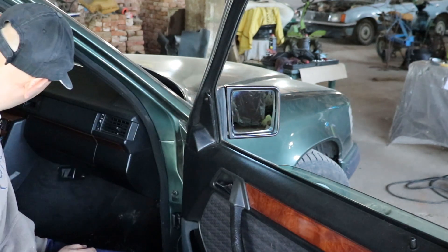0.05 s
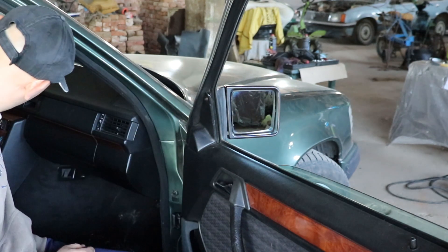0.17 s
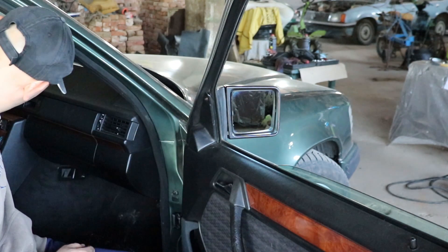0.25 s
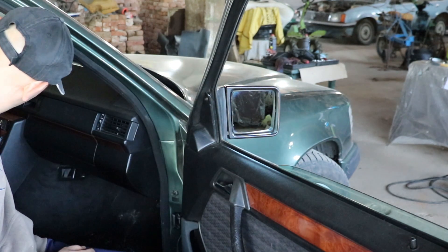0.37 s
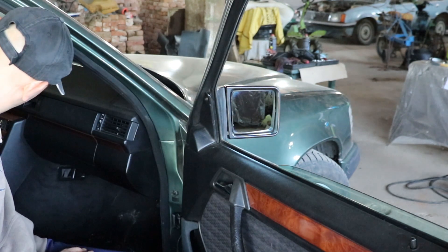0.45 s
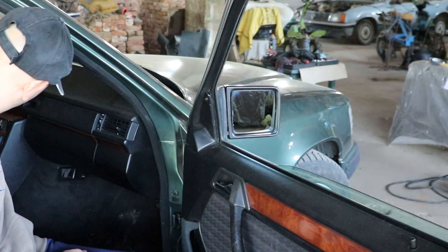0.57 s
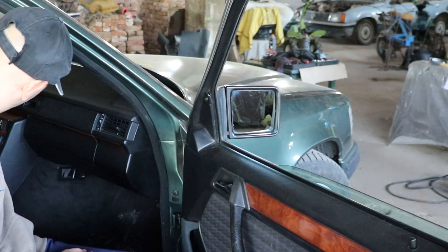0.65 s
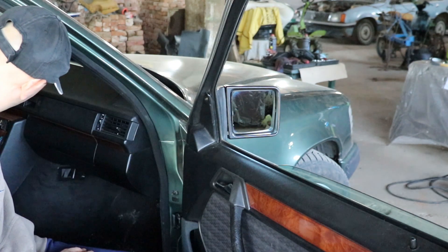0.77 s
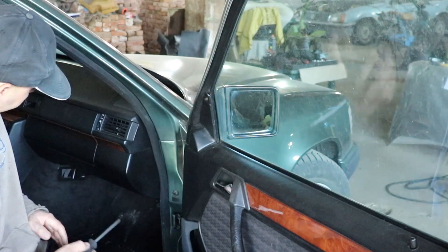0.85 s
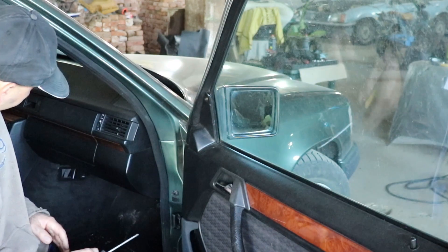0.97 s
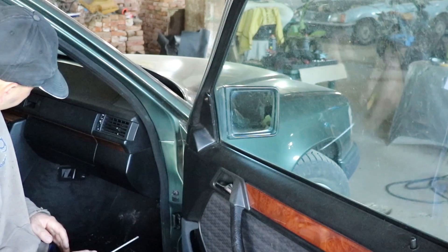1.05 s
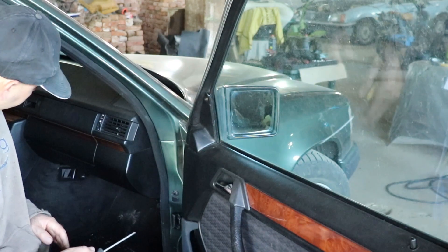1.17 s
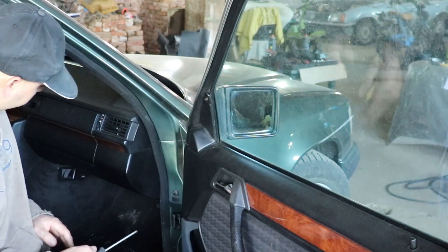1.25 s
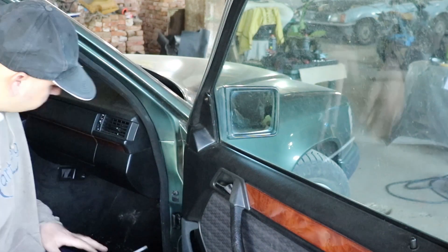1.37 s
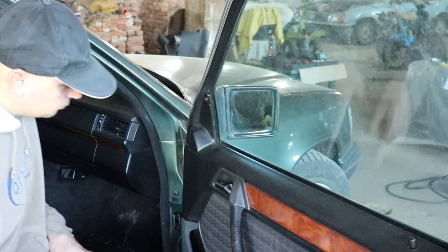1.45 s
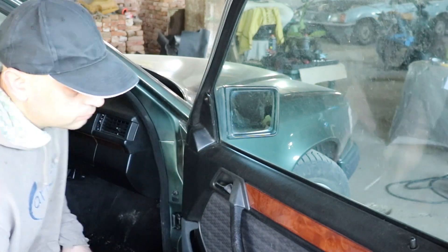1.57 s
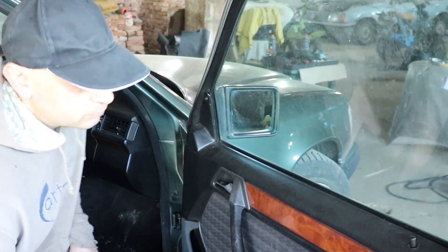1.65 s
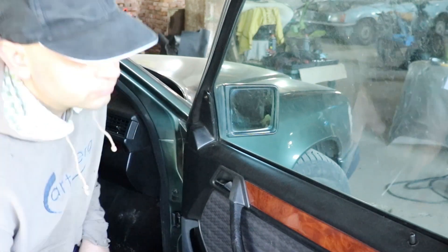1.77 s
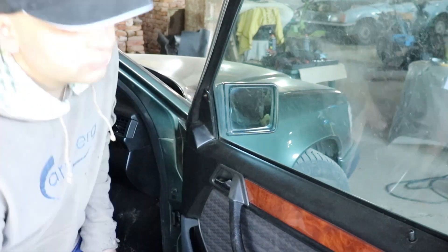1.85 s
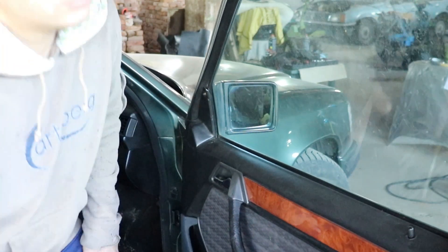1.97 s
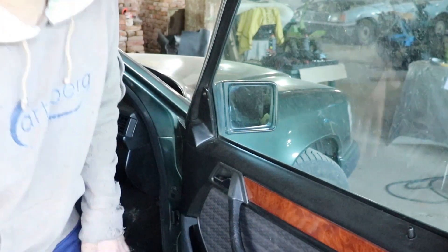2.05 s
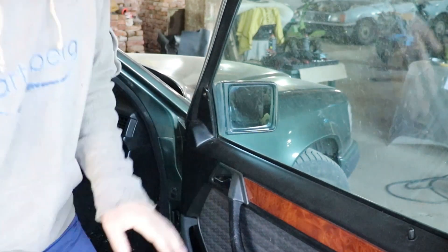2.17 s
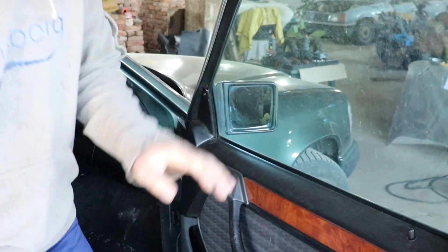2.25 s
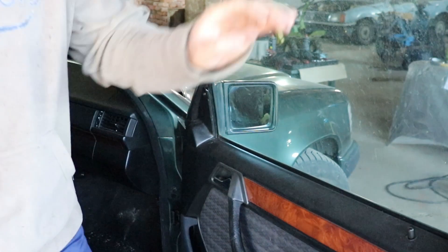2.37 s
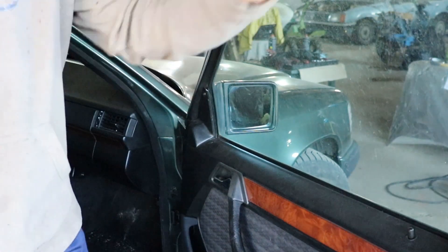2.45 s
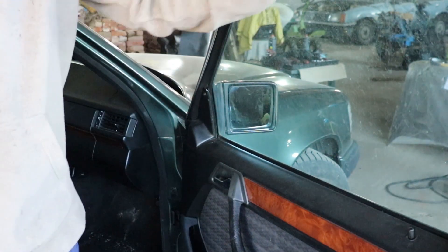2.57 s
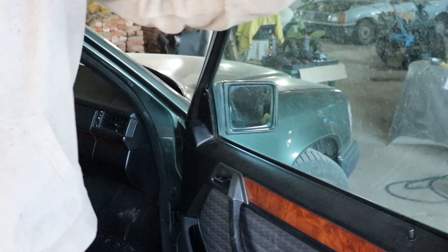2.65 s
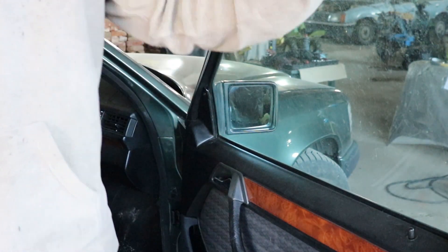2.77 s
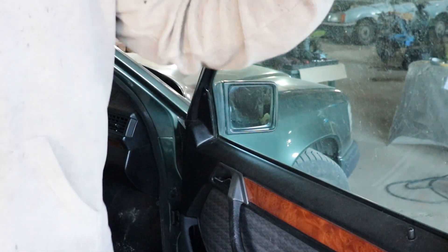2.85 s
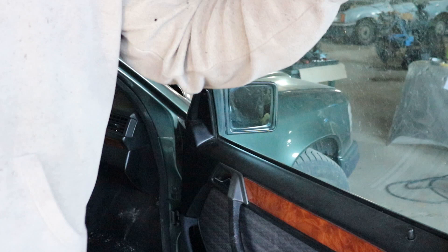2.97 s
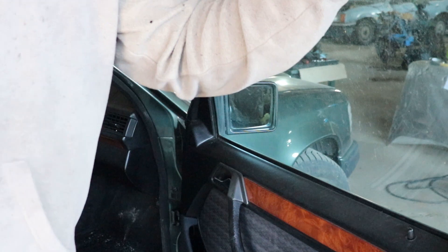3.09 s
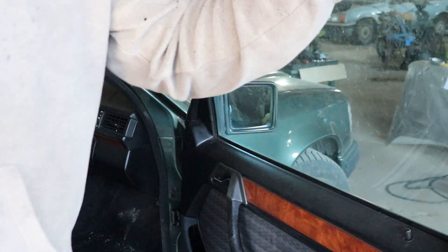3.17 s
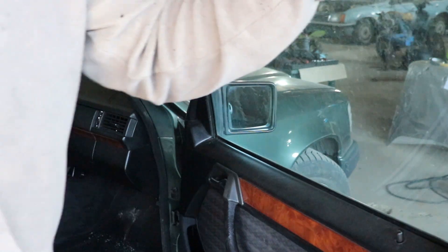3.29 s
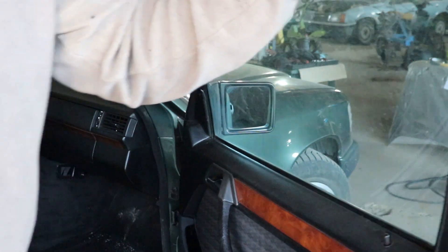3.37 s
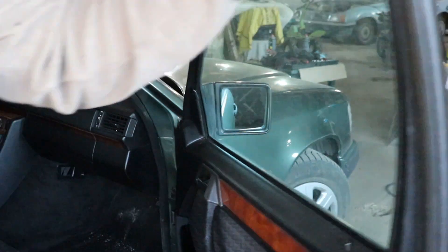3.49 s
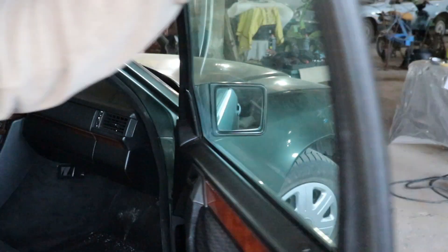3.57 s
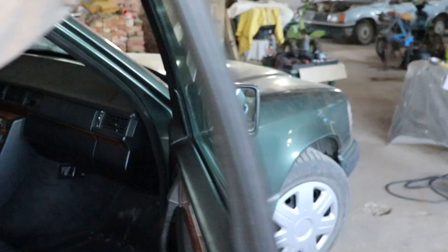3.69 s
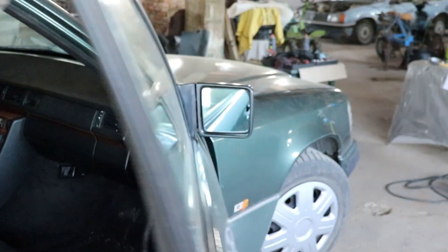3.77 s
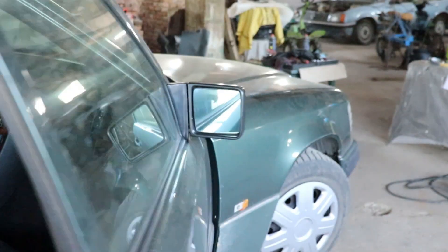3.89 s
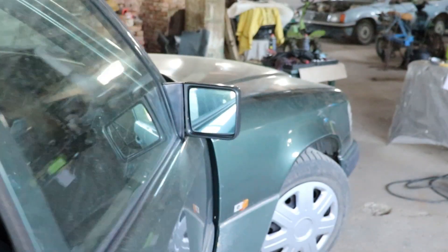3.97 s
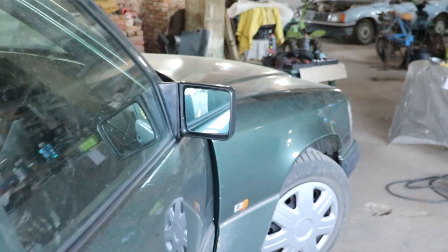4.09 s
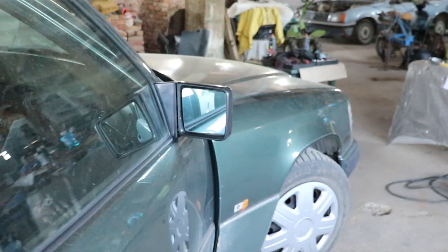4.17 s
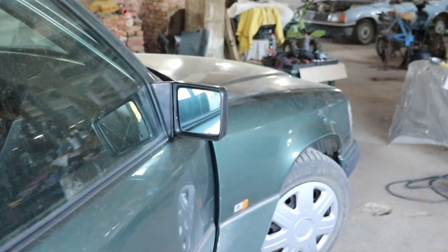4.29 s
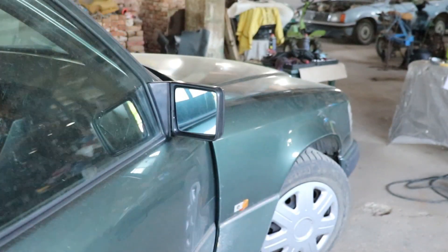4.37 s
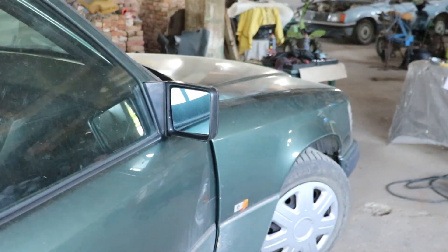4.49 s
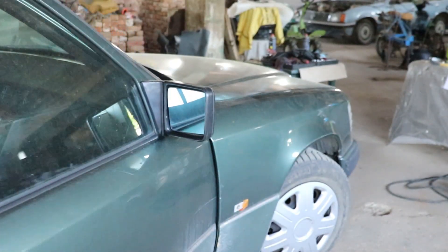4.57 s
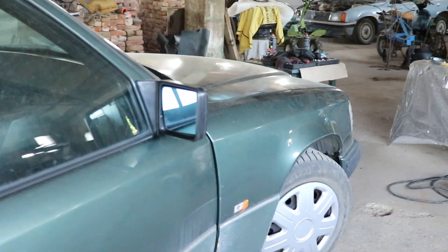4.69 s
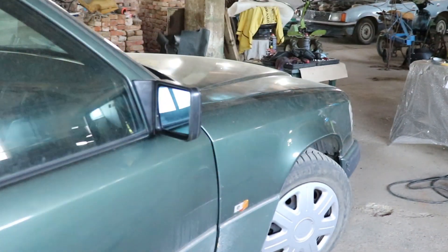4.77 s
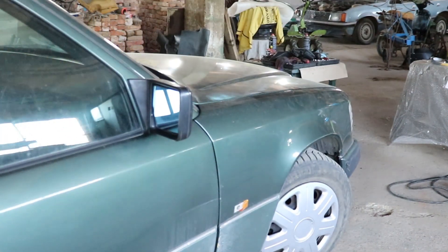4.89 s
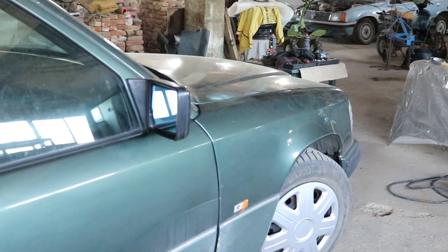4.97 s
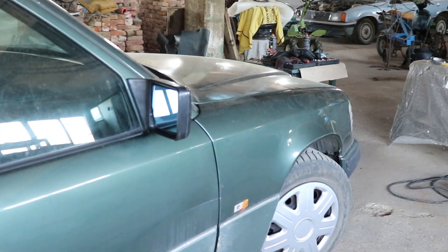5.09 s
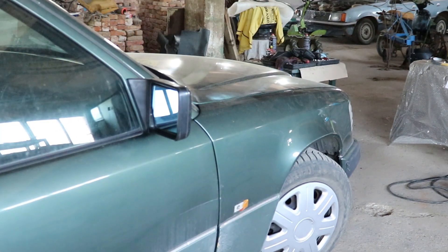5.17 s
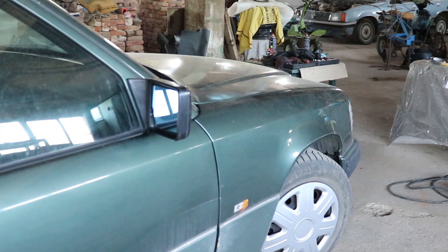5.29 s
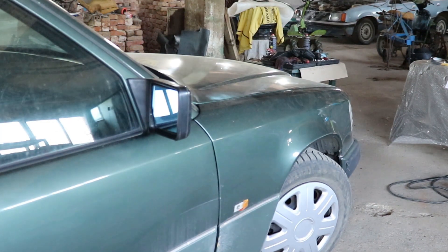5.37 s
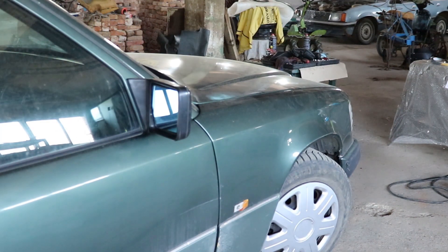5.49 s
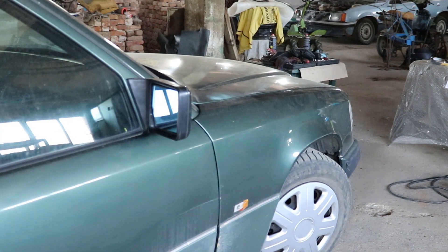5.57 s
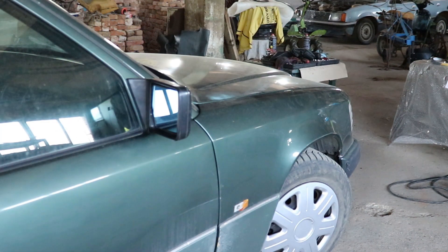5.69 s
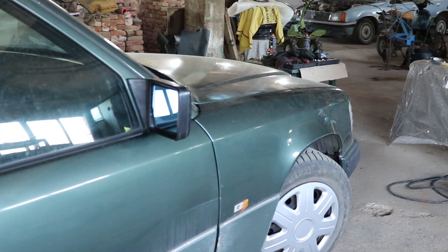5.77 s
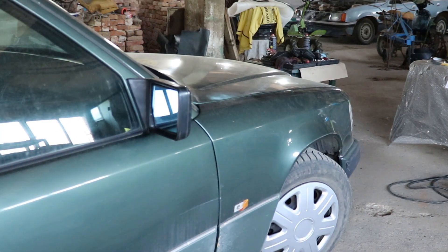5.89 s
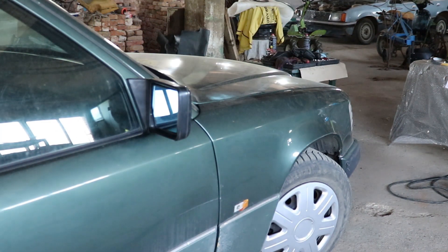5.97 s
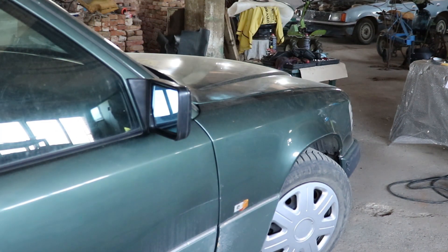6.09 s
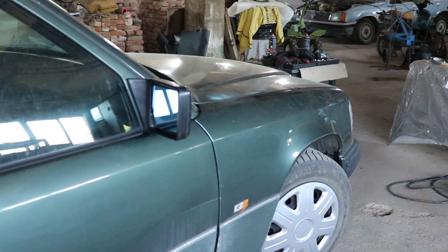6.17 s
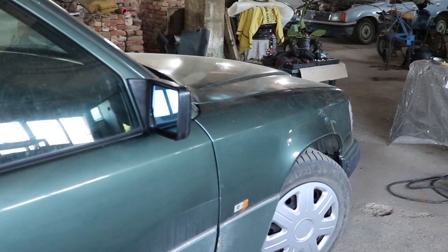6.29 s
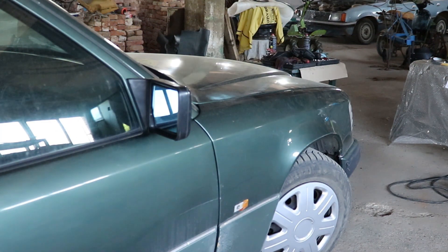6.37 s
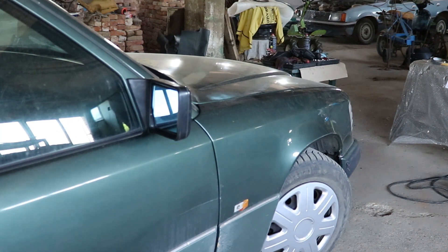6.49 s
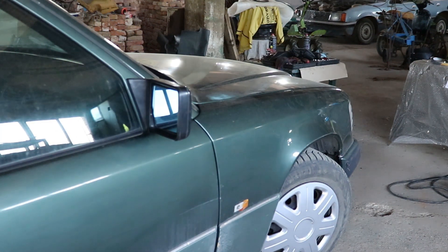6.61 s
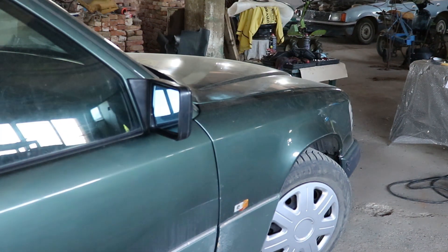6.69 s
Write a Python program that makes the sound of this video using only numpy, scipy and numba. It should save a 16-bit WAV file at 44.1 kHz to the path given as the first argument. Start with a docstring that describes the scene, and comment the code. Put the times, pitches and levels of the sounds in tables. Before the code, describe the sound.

A quiet, steady hiss of workshop air lies under everything, heard on close stereo microphones. For the first two seconds someone climbs out of a car: clothes rub, the seat creaks faintly, and a hand tool makes small clicks and thin clinks. A dull footfall lands at about 1.6 seconds, a light metallic clink at 2.4, and soft bumps and scuffs at 2.8 and 3.6. At about 3.9 the door, slightly left, swings with a sharp hinge clack and a hollow knock. Just after 5 seconds it slams shut, by far the loudest event: a rubber seal thump, a steel latch crash, quick rattles, buzzing trim and a deep boom from the car body. The level dips briefly under the slam, and the large hall rings for about a second. Faint rustles, shoe scuffs and soft bumps follow from about 5.7 to 6.7 seconds.

```python
"""Car door in a large workshop

Close by, on a camera's stereo microphones, someone climbs out of an old saloon car: small clicks,
seat rustle, steps. The door, a little to the left, swings over its check strap with a clack and a
knock, then slams: seal thump, latch crash, rattles, cabin boom. The limiter ducks; the hall rings on."""
import sys
import numpy as np
from scipy import signal
from scipy.fft import rfft, irfft, next_fast_len
from scipy.io import wavfile
from scipy.ndimage import uniform_filter1d, minimum_filter1d
from numba import njit

SR = 44100
rng = np.random.default_rng(int(sys.argv[2]) if len(sys.argv) > 2 else 0)


def wrap_up_sound(samples):
    """Save the sound to the file named by the first command line argument, as 16-bit audio."""
    columns = np.atleast_2d(samples).T
    # keep every value between -1 and 1, then stretch to whole-number steps
    tamed = np.clip(columns, -1, 1)
    steps = np.round(tamed * 32767).astype(np.int16)
    wavfile.write(sys.argv[1], SR, steps)


N = 297234
T = np.arange(N) / SR

# the check strap rolls over its notch: t/s, strap ring/dB, hinge clatter/dB
STRAP_SNAPS = [(3.8517, -24, -47), (3.8539, -14, -20.5), (3.8554, -6, -26), (3.94, -30, -33.5),
               (3.9433, -18.5, -27.5)]


def undb(db):
    """Decibels to gain."""
    return 10 ** (np.asarray(db) / 20)


def unit(x):
    """Scale to rms 1."""
    return x / np.sqrt(np.mean(x ** 2))


def impact(x):
    """Scale to the energy of 10 ms at rms 1."""
    return x / np.sqrt(np.mean(x ** 2) * x.shape[-1] / SR * 100)


def add(out, s, x):
    """Mix x in from time s on."""
    i = max(int(s * SR), 0)
    out[..., i:i + x.shape[-1]] += x[..., :N - i]


def on_log(hz, points):
    """Read (f/Hz, value) points on a log-frequency axis."""
    f, value = np.transpose(points)
    return np.interp(np.log(hz + 1), np.log(f), value)


def colour(x, points, size=4096):
    """Minimum-phase filter with the given (f/Hz, level/dB) response."""
    gain = undb(on_log(np.fft.rfftfreq(size, 1 / SR), points))
    cepstrum = irfft(np.log(gain))
    cepstrum[1:size // 2] *= 2
    cepstrum[size // 2 + 1:] = 0
    response = irfft(np.exp(rfft(cepstrum)))
    return signal.fftconvolve(x, response[None], axes=1)[:, :x.shape[1]]


def resonate(x, hz, q):
    """One resonance."""
    return signal.lfilter(*signal.iirpeak(min(hz, SR / 3), max(q, hz / SR * 4), fs=SR), x)


def band(x, hz, q):
    """The same resonance twice, for steeper skirts."""
    return resonate(resonate(x, hz, q), hz, q)


def low_cut(x, hz):
    """A small part cannot radiate long waves."""
    return signal.sosfilt(signal.butter(2, hz, "high", fs=SR, output="sos"), x)


def diffuse(count, mic_spacing_s=0.00029):
    """Noise from all sides: microphones 10 cm apart agree only in the bass."""
    size = next_fast_len(count, True)
    mid, side = rfft(rng.standard_normal((2, size)))
    alike = np.sinc(2 * np.fft.rfftfreq(size, 1 / SR) * mic_spacing_s)
    mid, side = mid * np.sqrt((1 + alike) / 2), side * np.sqrt((1 - alike) / 2)
    return irfft([mid + side, mid - side], size)[:, :count]


def fade(t, rise, t60):
    """Smooth attack and exponential decay."""
    return (1 - np.exp(-(t / rise) ** 2)) * undb(-60 * t / t60)


def burst(rise, t60, count=8192):
    """Countless close modes ringing down together."""
    return diffuse(count) * fade(T[:count], rise, t60)


def ring(modes, rise):
    """The clear modes of a struck part."""
    t = T[T < 1.2 * max(t60 for _, _, t60 in modes)]
    return sum(undb(db) * np.sin(2 * np.pi * hz * t) * fade(t, rise, t60) for hz, db, t60 in modes)


def grains(rate, rough_db, count=N):
    """Friction noise: fibres and grit catch and slip with uneven strength."""
    strength = rng.standard_normal(count // 20)
    flicker_db = rough_db * np.interp(T[:count] * rate, np.arange(len(strength)), strength)
    return unit(diffuse(count) * undb(flicker_db))


def pan(x, left_db, lag=0):
    """The left microphone leads the right by left_db in level and by lag samples in time."""
    left, right = np.broadcast_to(x, (2, N))
    return np.array([left * undb(left_db / 2), np.roll(right, lag) * undb(-left_db / 2)])


def compact(x):
    """A small source gives both microphones mostly the same wave."""
    return np.array([x[0], (x[0] + x[1]) / np.sqrt(2)])


def shaded(x):
    """The camera housing colours what reaches the right microphone."""
    housing = [(700, -0.5), (1300, -2), (2300, 2), (4400, 1.5), (8000, 0), (14000, -3)]  # response on the far side: f/Hz, level/dB
    return np.array([x[0], colour(x[1:], housing)[0]])


def effort(release_share=0.68):
    """Strength of the low rub and the cloth hiss: each movement swells, then dies a little faster."""
    moves = [(.015, .06, -52.5, -70), (.35, 0.14, -54, -74), (.99, 0.081, -56, -59.5),
             (1.32, 0.11, -50.5, -68), (1.601, 0.19, -47, -54), (1.898, 0.12, -50.5, -51.5),
             (2.47, 0.13, -54.5, -54.5), (2.93, 0.26, -53, -52), (3.33, 0.28, -55.5, -53.5),
             (3.601, 0.062, -42.5, -51.5), (3.8, 0.25, -47.5, -49.5), (4.5, 0.36, -54.5, -63),
             (4.98, 0.42, -55, -64), (5.72, 0.29, -53, -59), (6.28, 0.23, -55.5, -57),
             (6.7, 0.23, -56, -58)]  # shifts of the body: peak t/s, swell/s, rub/dB, cloth/dB
    rub, cloth = np.zeros(N), np.zeros(N)
    for s, swell, rub_db, cloth_db in moves:
        width = np.where(T < s, swell, swell * release_share)
        power = np.exp(-2 * ((T - s) / width) ** 2)
        rub += power * undb(rub_db) ** 2
        cloth += power * undb(cloth_db) ** 2
    return np.sqrt(rub), np.sqrt(cloth)


def rustle(rubbing, brushing):
    """Clothes rub over the seat and hiss as they brush."""
    rub_spectrum = [(50, -11), (200, 0), (550, -0.5), (1000, -2), (2200, -9), (4000, -26.5), (10000, -27.5)]  # low rubbing: f/Hz, level/dB
    cloth_spectrum = [(800, 2), (2500, 13), (7500, 5.5), (11000, 1), (16000, -35)]  # fabric hiss: f/Hz, level/dB
    rub = unit(colour(grains(rate=160, rough_db=3), rub_spectrum))
    cloth = unit(colour(grains(rate=180, rough_db=3), cloth_spectrum))
    return rub * rubbing + cloth * brushing * undb(-1.5)


def creaks(rubbing, peak_slips_per_s=80, out_of_seat_s=2.0):
    """Seat covers stick and slip in gritty ticks, denser and louder as the rubbing grows."""
    seated = T < out_of_seat_s
    chance = peak_slips_per_s / SR * rubbing / rubbing[seated].max()
    slips = seated * (rng.random(N) < chance) * rng.uniform(0.73, 1, N)
    tick = band(burst(rise=0.00025, t60=0.014), hz=1700, q=0.88)
    ticks = signal.fftconvolve(slips[None], tick, axes=1)[:, :N]
    return ticks / ticks[:, seated].std() * rubbing * undb(-7.5)


def taps(blows, q, rise, tick_hz, tick_q):
    """Light blows: a damped resonance with a broad tick of contact on top."""
    out = np.zeros((2, N))
    for s, db, hz, tick_db, t60 in blows:
        tone = impact(band(burst(rise, t60), hz, q))
        tick = impact(band(burst(rise, t60), tick_hz, tick_q))
        add(out, s, undb(db) * (tone + undb(tick_db) * tick))
    return out


def clicks():
    """A hand tool and trim meet in small hard clicks."""
    blows = [(.235, -50, 577, -13, 0.044), (.278, -47, 610, -20, 0.067), (.293, -40, 1500, -1, 0.035),
             (.378, -39.5, 1670, -6.5, 0.035), (.417, -49.5, 1690, -16, 0.036),
             (1.001, -50, 1460, -5, 0.051), (1.17, -50, 600, -19, 0.037), (1.21, -44, 900, -11, 0.024),
             (1.221, -45, 1420, -3.5, 0.032), (1.257, -46.5, 2760, -6, 0.046),
             (1.77, -42.5, 1780, -26, 0.064), (1.796, -44.5, 2010, -14, 0.05), (1.855, -43, 1760, -6, .06),
             (2.424, -43, 2420, -16, 0.2), (3.259, -44.5, 1090, -26, 0.023),
             (3.767, -33.5, 1200, -3, 0.044), (4.473, -39.5, 3080, -17, 0.11),
             (4.497, -52, 3450, -5, 0.038), (4.852, -47.5, 1514, -10, 0.029),
             (6.489, -56, 3670, 5.5, 0.084)]  # hard contacts: t/s, level/dB, f/Hz, relative tick/dB, t60/s
    return taps(blows, q=0.75, rise=0.00056, tick_hz=4100, tick_q=0.86)


def clinks():
    """A hand tool rings on after touching the trim."""
    tones = [(0.295, -64, 1690, 0.31), (.379, -51, 1680, 0.24), (1.002, -53.5, 3350, 0.085),
             (2.426, -43, 2710, 0.061)]  # thin ringing metal: t/s, level/dB, f/Hz, t60/s
    out = np.zeros((2, N))
    for s, db, hz, t60 in tones:
        add(out, s, undb(db) * ring([(hz, 0, t60)], rise=0.0004))
    return out


def bumps():
    """Feet and elbows land with dull bumps."""
    blows = [(.875, -50, 295, -12, 0.1), (1.313, -47.5, 400, -16, 0.11), (1.553, -37.5, 407, -11, 0.076),
             (1.598, -46.5, 260, 2, 0.11), (1.77, -43, 202, -18, 0.22), (1.87, -51, 217, -2, 0.083),
             (2.834, -43.5, 282, -7, 0.024), (2.836, -41, 745, -2, 0.15), (3.582, -36.5, 606, -23, 0.089),
             (3.65, -43, 284, -24, 0.08), (6.349, -46, 332, -8, 0.023), (6.355, -36, 106, -30.5, 0.094),
             (6.641, -47.5, 880, -27, 0.074), (6.6595, -35, 784, -36, 0.06), (6.682, -36, 252, -17, 0.24)]  # soft contacts: t/s, level/dB, f/Hz, relative tick/dB, t60/s
    return taps(blows, q=1.0, rise=0.0014, tick_hz=1800, tick_q=0.36)


def scuffs():
    """Soles and sleeves slide in short swells of bright grit."""
    slides = [(1.282, 0.031, -53.5, 5000), (1.583, 0.029, -47, 4500), (2.149, 0.075, -56.5, 8100),
              (2.866, 0.14, -57.5, 6000), (3.765, 0.019, -42.5, 6100), (4.196, 0.029, -47, 6300),
              (4.421, 0.024, -51, 3654), (4.479, 0.033, -46.5, 4300), (4.853, 0.015, -47, 6240),
              (5.788, 0.066, -56.5, 6300), (6.193, 0.028, -55.5, 5000), (6.248, 0.029, -48.5, 7100)]  # brief slides: middle t/s, half length/s, level/dB, f/Hz
    out = np.zeros((2, N))
    t = T[:SR // 4] - 1 / 8
    for s, half, db, hz in slides:
        grit = unit(band(grains(rate=330, rough_db=3, count=len(t)), hz, q=0.95))
        add(out, s + t[0], undb(db) * grit * np.exp(-(t / half) ** 2))
    return out


def check_strap():
    """The roller snaps over the notch of the strap and rings briefly."""
    modes = [(550, -6, 0.019), (1060, 2.5, 0.01), (1210, -2, 0.0077), (1590, 0, 0.023), (2010, -7, 0.01),
             (2390, 1, 0.0038), (2600, -14, 0.0078), (3080, -13, 0.012), (4260, -6.5, 0.0044),
             (5860, -27, 0.011), (8300, -21, 0.0086)]  # strap modes: f/Hz, level/dB, t60/s
    out = np.zeros(N)
    for s, db, _ in STRAP_SNAPS:
        add(out, s, undb(db) * ring(modes, rise=0.00019))
    return pan(low_cut(out, hz=550), left_db=2.5, lag=1)


def hinge(t60):
    """The sheet metal around the hinge clatters with each snap of the strap."""
    spectrum = [(100, -27.5), (300, -3), (700, -3), (1300, 1.5), (1900, -0.5), (2700, -8.5), (4500, -16.5),
                (8000, -26.5), (16000, -51)]  # sheet metal clatter: f/Hz, level/dB
    out = np.zeros((2, N))
    for s, _, db in STRAP_SNAPS:
        add(out, s, undb(db) * impact(colour(burst(rise=0.00092, t60=t60), spectrum)))
    return out


def latch(linger_s=0):
    """The latch crashes onto the striker; rods and window gear rattle in the door."""
    # steel on steel: t/s, level/dB, rise/s, t60/s, ring f/Hz, relative ring/dB
    blows = [(3.9405, -32.5, 0.00096, 0.099, 1910, -2), (5.0173, -36.5, .002, 0.23, 980, 7.5),
             (5.038, -25, 0.0019, 0.066, 880, -5), (5.0448, -3, 0.0026, 0.024, 2190, -13),
             (5.0575, -19.5, 0.00054, 0.03, 6600, -0.5), (5.067, -25, 0.00049, .014, 1550, 2),
             (5.106, -26, 0.00084, 0.047, 1020, -5), (5.1165, -29.5, 0.0018, 0.042, 1305, 9.5),
             (5.122, -21.5, 0.0008, 0.037, 3520, -4.5), (5.149, -32, 0.0016, 0.025, 7060, 3.5),
             (5.186, -31, 0.00086, 0.062, 4400, -2.5), (5.283, -43, 0.0024, .04, 5000, 2)]
    spectrum = [(100, -24), (300, -1.5), (700, 4.5), (1400, 0.5), (2200, 2), (3200, -3), (4500, -5.5),
                (5600, -7), (7500, -5), (9500, -8.5), (14500, -20), (17000, -35)]  # steel crash: f/Hz, level/dB
    out = np.zeros((2, N))
    for s, db, rise, t60, hz, ring_db in blows:
        crash = impact(colour(burst(rise, t60 + linger_s), spectrum))
        part = impact(resonate(burst(rise, t60 + linger_s), hz, q=7.0))
        add(out, s, undb(db) * (crash + undb(ring_db) * part))
    return out


def door_panel():
    """The damped door skin thumps as the strap lets go and as the rubber seal lands."""
    blows = [(3.9422, -14.5, 0.00064), (3.9507, -12.5, 0.0012), (3.9625, -14.5, 0.0015),
             (5.009, -26, 0.003), (5.0193, -48, 0.00073), (5.028, 0, 0.0027), (5.046, -8.5, 0.00082),
             (5.068, -17, 0.00086), (5.128, -5, 0.0017), (5.16, -7.5, 0.002)]  # blunt blows: t/s, level/dB, rise/s
    modes = [(311, -3, 0.03), (401.6, 0, 0.034), (461, -8, 0.059), (564, -7.5, 0.048), (677, -7.5, 0.038),
             (832, -10, 0.024), (1150, -16, 0.016), (1405, -16, 0.02)]  # door skin modes: f/Hz, level/dB, t60/s
    out = np.zeros(N)
    for s, db, rise in blows:
        add(out, s, undb(db) * ring(modes, rise))
    return pan(low_cut(out, hz=270), left_db=2.0, lag=6)


def car_body():
    """Cabin air and large panels boom while the shell shudders."""
    blows = [(3.943, -63, -30, 0.0048), (4.01, -43, -33, 0.0063), (5.056, -28, -14, 0.0032),
             (5.12, -56, -17.5, 0.0098), (5.165, -49, -17, 0.0094), (5.545, -50, -42, 0.01),
             (6.353, -53.5, -39.5, 0.0065)]  # jolts to the car: t/s, boom/dB, shudder/dB, rise/s
    modes = [(32.6, -2, 0.18), (49, 3.5, 0.34), (59, -3, 1.25), (84.7, -4, 1.3), (103, 0, 0.31),
             (144.3, -5, 1), (227, -8.5, 0.99), (323.7, -5, 1.3), (470, -1.5, 0.66), (536, -11, 1.6),
             (653, -19, 1.6)]  # cabin and panel modes: f/Hz, level/dB, t60/s
    spectrum = [(20, -9), (45, 7), (80, 7.5), (130, 5), (220, 6.5), (450, -1), (700, -5.5), (1200, -12),
                (3000, -36.5)]  # shuddering shell: f/Hz, level/dB
    out = np.zeros((2, N))
    for s, boom_db, shudder_db, rise in blows:
        shudder = impact(colour(burst(rise, t60=0.36, count=SR), spectrum))
        add(out, s, undb(boom_db) * ring(modes, rise))
        add(out, s, undb(shudder_db) * shudder)
    return pan(out, left_db=2.5, lag=3)


def trim_buzz(start_s=5.05, level_db=-32):
    """Loose trim chatters finely after the slam and settles."""
    spectrum = [(500, -22), (2000, -2), (6000, 0), (10000, -8), (15000, -7)]  # buzzing trim: f/Hz, level/dB
    out = np.zeros((2, N))
    chatter = unit(colour(grains(rate=640, rough_db=2, count=SR), spectrum))
    add(out, start_s, undb(level_db) * chatter * fade(T[:SR], rise=0.011, t60=0.42))
    return out


def hall(x, near_db=-8, far_db=-7, far_rise_s=0.062):
    """Floor and car answer at once; the far walls build up slowly and lose their treble first."""
    bands = [(41, -1, 1.86), (120, 0.5, 1.34), (314, -2.5, 1.04), (574, 1.5, 1.02), (1240, -3, 1.025),
             (2500, -6, 1.05), (4900, -5, 0.9), (7950, -6, 0.63), (15000, -29, 0.35)]  # workshop reverberation: f/Hz, level/dB, t60/s
    count = 2 * SR
    hz, t, noise = signal.stft(diffuse(count), SR, nperseg=512)
    t60 = on_log(hz, [(f, decay) for f, _, decay in bands])[:, None]
    tail = signal.istft(noise * undb(-60 * t / t60), SR)[1][:, :count]
    far = tail * (1 - np.exp(-T[:count] / far_rise_s)) / np.sqrt(SR / 20)
    near = burst(rise=0.004, t60=0.24, count=count) / np.sqrt(SR / 100)
    echo = colour(undb(far_db) * far + undb(near_db) * near, [(f, db) for f, db, _ in bands])
    return signal.fftconvolve(x[:1], echo, axes=1)[:, :N]


def room_tone(level_db=-54.5):
    """Still workshop air, with separate hiss in each microphone."""
    spectrum = [(20, -24), (40, -14), (62, 5.5), (100, -3.5), (200, -5), (500, -3.5), (1000, -7.5),
                (1700, -9.5), (3000, -13), (7000, -16), (11000, -21), (15500, -26)]  # noise floor: f/Hz, relative level/dB
    hiss = 1.08 * rng.standard_normal((2, N))
    return undb(level_db) * unit(colour(diffuse(N) + hiss, spectrum))


def scene():
    """Person and door are heard directly and through the hall, over the room tone."""
    rubbing, brushing = effort()
    small_sounds = rustle(rubbing, brushing) + creaks(rubbing) + clicks() + clinks() + scuffs()
    knocks, strap, thump, boom = bumps(), check_strap(), door_panel(), car_body()
    clatter = pan(hinge(t60=0.031), left_db=-0.5, lag=1)
    crash = pan(compact(latch()), left_db=2.0, lag=7)
    door = strap + shaded(clatter + crash + trim_buzz()) + thump + boom
    # sharp blows spread through the whole shell, which feeds them to the hall for longer
    shell = undb(6.5) * hinge(t60=0.089) + undb(-1) * latch(linger_s=0.04)
    person_send = undb(0.5) * small_sounds + undb(3.5) * knocks
    door_send = undb(-7) * strap + undb(-2) * thump + undb(-3) * boom + shell
    echo = pan(hall(person_send + door_send), left_db=0.9)
    return small_sounds + knocks + door + echo + room_tone()


@njit
def held_peak(size, release):
    """Peak follower: jumps up at once, sinks slowly."""
    out, held = np.empty(len(size)), 0.
    for i in range(len(size)):
        held = max(size[i], held * release)
        out[i] = held
    return out


def record(dry, threshold=1.26, release_s=0.14, saturation=0.88, top_hz=15900):
    """The limiter ducks under the slam and recovers; peaks are rounded and the top is cut."""
    peak = held_peak(np.abs(dry).max(axis=0), np.exp(-1 / (release_s * SR)))
    gain = threshold / np.maximum(peak, threshold)
    smooth_gain = uniform_filter1d(minimum_filter1d(gain, size=32), size=32)
    rounded = saturation * np.tanh(dry * smooth_gain / saturation)
    high_cut = signal.ellip(8, 0.05, 50, top_hz, fs=SR, output="sos")
    return signal.sosfiltfilt(high_cut, rounded)


dry = scene()
out = record(dry)
wrap_up_sound(out)
```